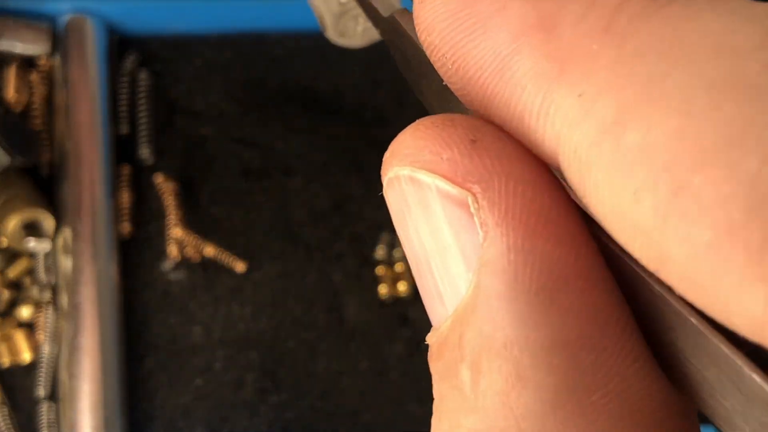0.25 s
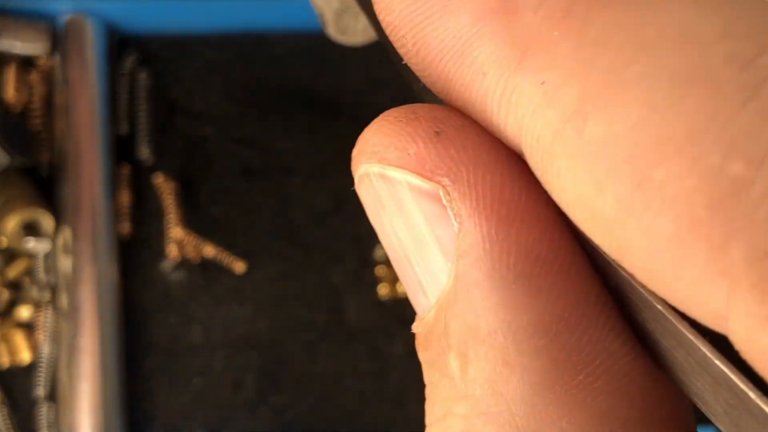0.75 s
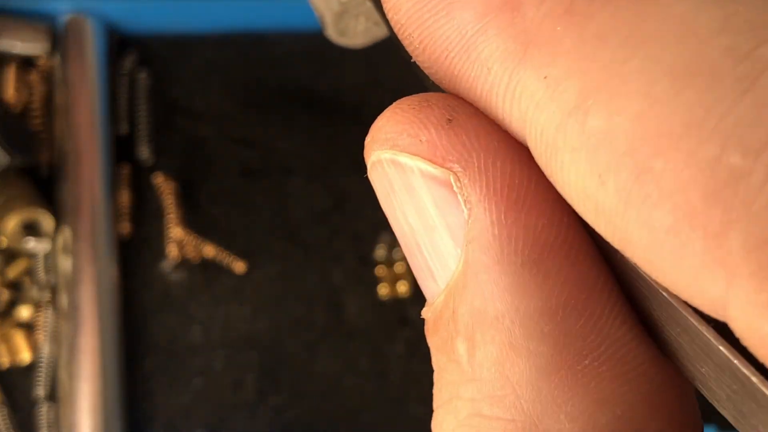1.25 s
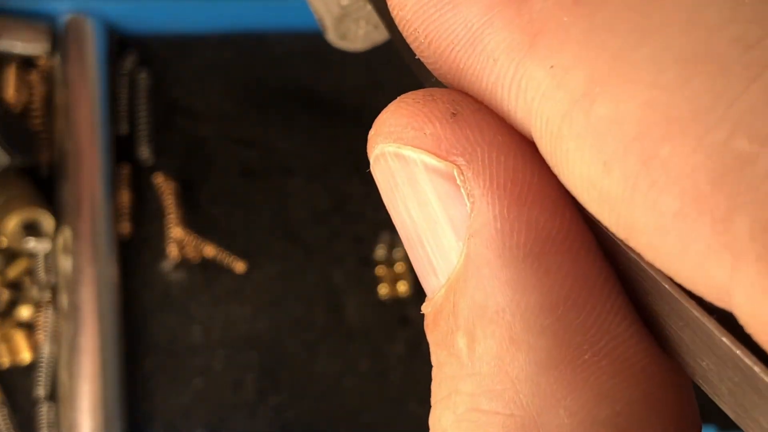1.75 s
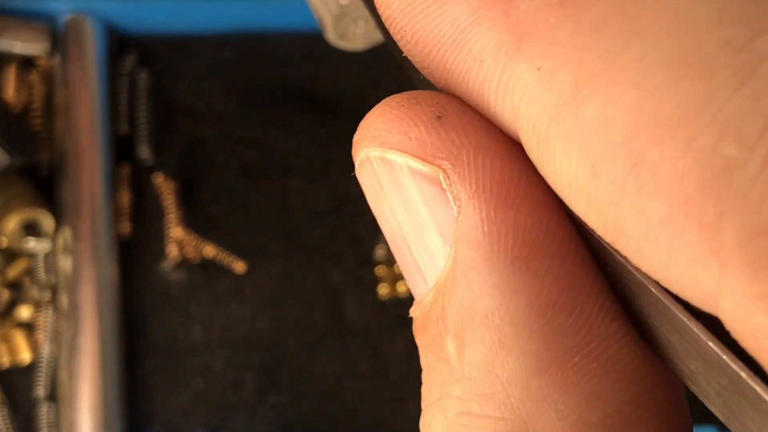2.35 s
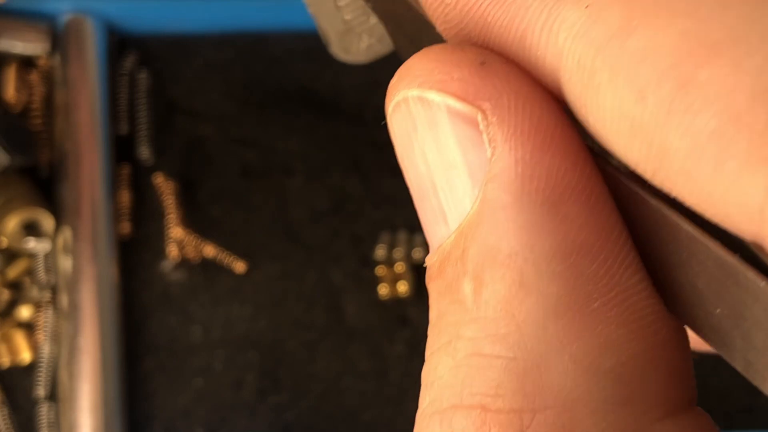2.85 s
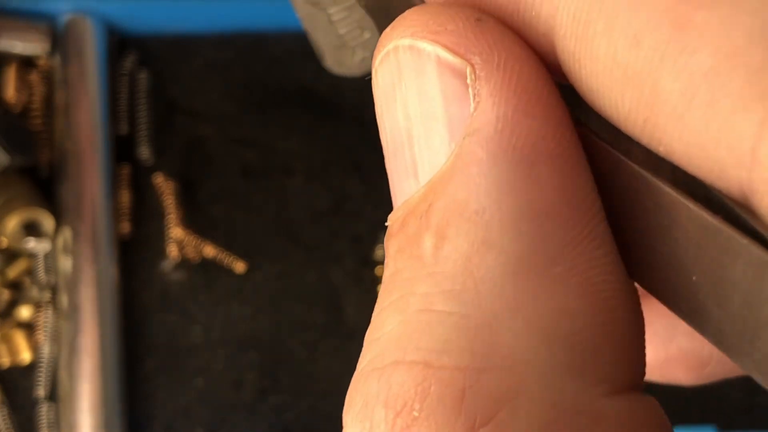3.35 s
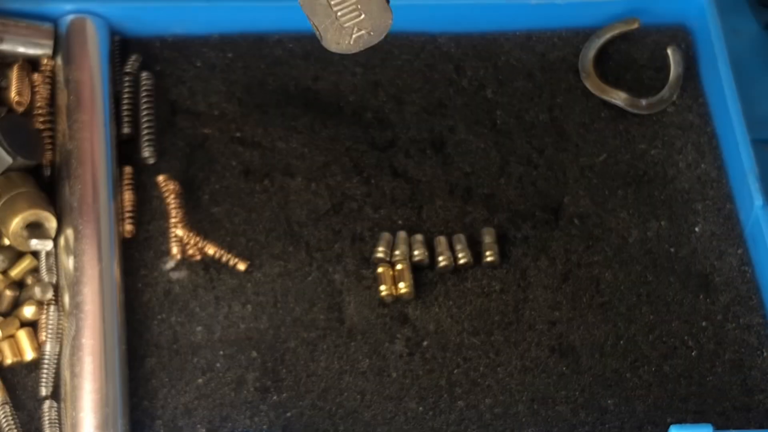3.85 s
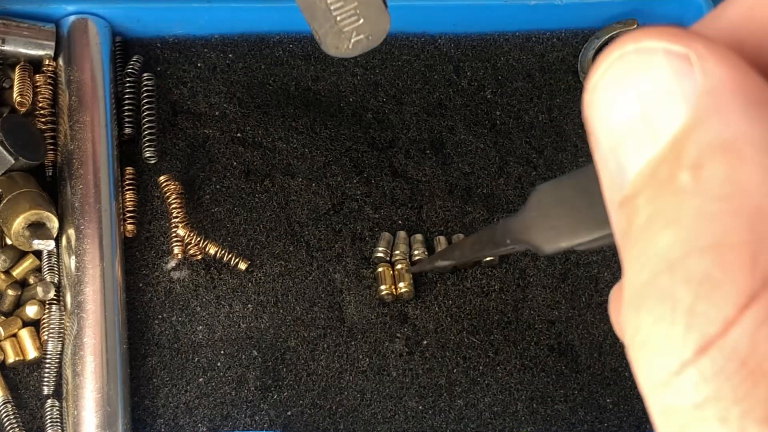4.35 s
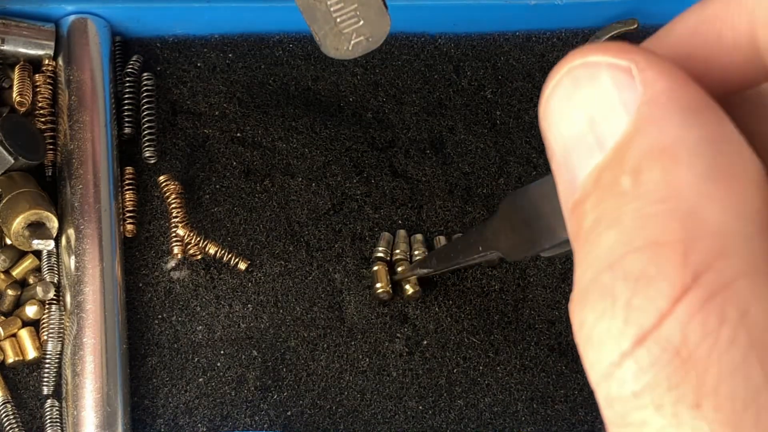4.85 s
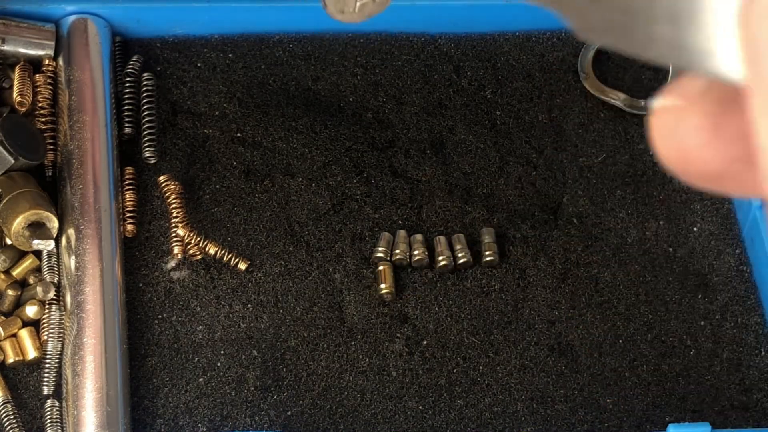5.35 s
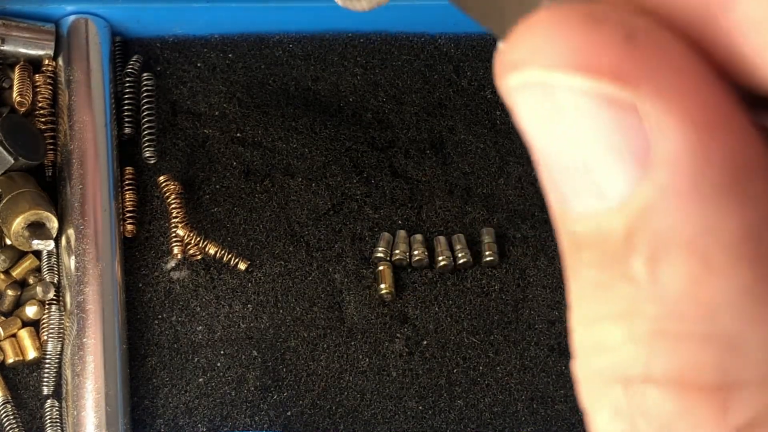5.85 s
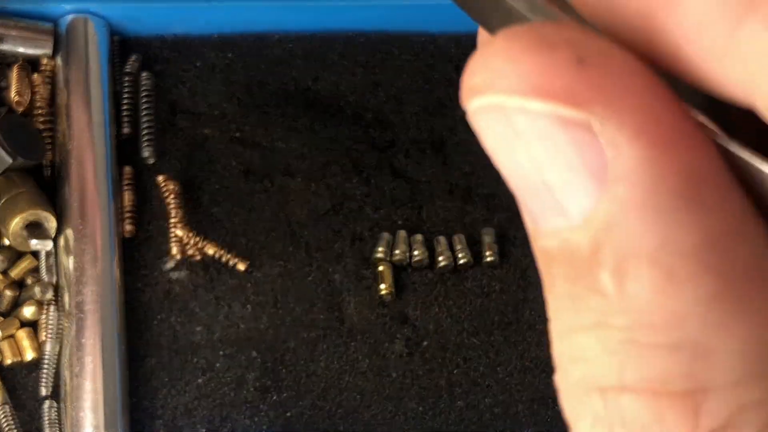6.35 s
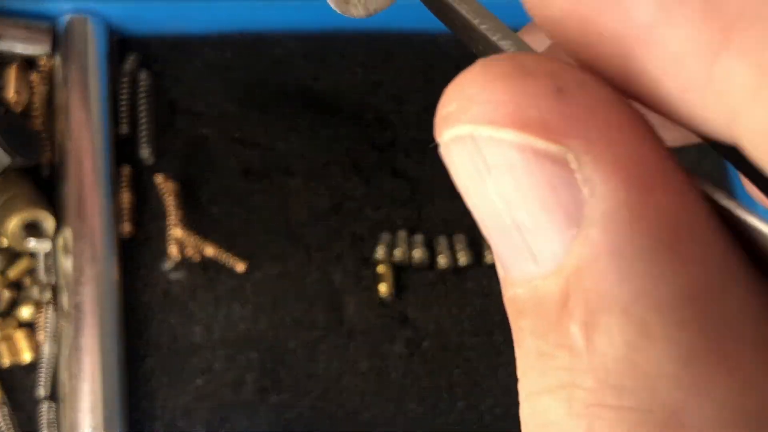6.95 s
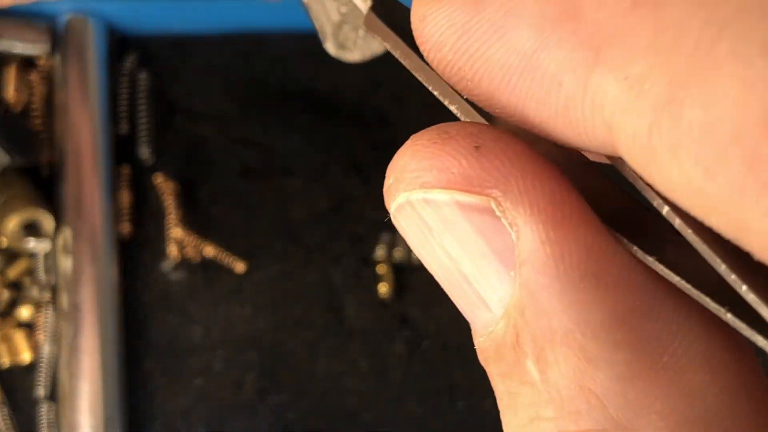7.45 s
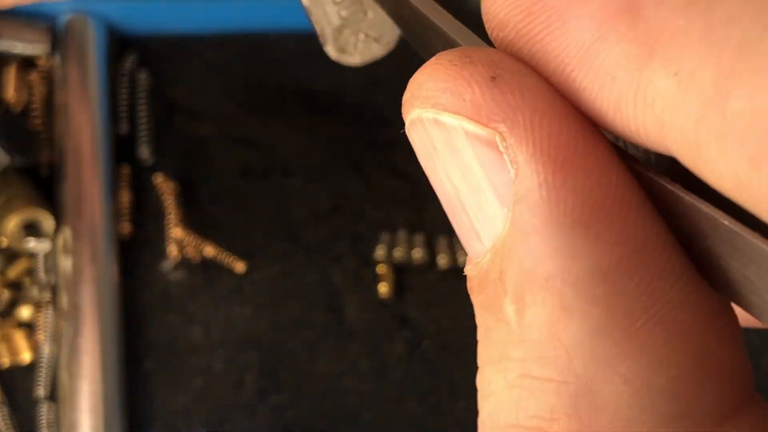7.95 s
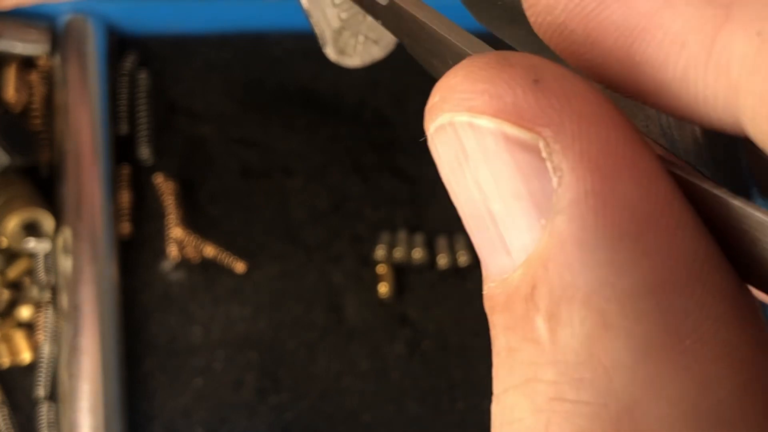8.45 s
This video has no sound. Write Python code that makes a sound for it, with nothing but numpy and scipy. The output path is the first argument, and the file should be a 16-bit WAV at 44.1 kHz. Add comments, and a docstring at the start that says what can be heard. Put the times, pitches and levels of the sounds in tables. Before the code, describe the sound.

Steel tweezers pick at small brass pins in a hand-held lock, close to the microphone. Light ticks lead to three sharp snaps and a short scrape. After a lull with faint hand rustle, a pin slides scratchily in its hole, followed by a quick cluster of bright clicks and clinks and a last scrape. A fan runs steadily in the quiet room.

```python
"""Sharp little snaps, ticks, clinks and scrapes sound close by, over a fan and a thin electronic whine.
Steel tweezers pick small brass pins from a hand-held lock in a quiet room. The tips strike and rub
the metal and make it ring; pins clink, and slide in their bores (the holes that hold them).
An automatic gain control turns the volume down for a moment after the loudest snaps."""
import sys
import numpy as np
from scipy import signal
from scipy.fft import rfft, irfft
from scipy.io import wavfile
from scipy.ndimage import uniform_filter1d

SR = 44100
rng = np.random.default_rng(int(sys.argv[2]) if len(sys.argv) > 2 else 0)


def to_wav(sig):
    """Store sig (one row per channel, or 1-D mono) as 16-bit WAV at the path in sys.argv[1].

    Samples outside -1..1 are clipped; the rate is SR.
    """
    pcm = np.clip(np.atleast_2d(sig), -1, 1) * 32767
    pcm = np.round(pcm).astype(np.int16)
    wavfile.write(sys.argv[1], SR, pcm.T)  # frames by channels


N = 383669
TIME = np.arange(N) / SR


def amp(db):
    """Turns decibels into a gain."""
    return 10 ** (np.asarray(db) / 20)


def unit(x):
    """Scales a sound to an average (rms) level of 1."""
    return x / np.sqrt(np.mean(x ** 2) + 1e-20)


def read(points, hz):
    """Reads between the rows of a table, on a log-frequency axis."""
    f, value = np.transpose(points)
    return np.interp(np.log(hz + 1), np.log(f + 1), value)


def add(mix, start_s, sound):
    """Mixes a sound in at its start time."""
    part = mix[max(round(start_s * SR), 0):][:len(sound)]
    part += sound[:len(part)]


def noise(gain):
    """Noise of level 1, coloured by gain(Hz)."""
    spectrum = rfft(rng.standard_normal(N)) * gain(np.fft.rfftfreq(N, 1 / SR))
    return unit(irfft(spectrum, N))


def narrow(hz, width):
    """Noise gathered around one frequency."""
    return noise(lambda f: 1 / (1 + ((f - hz) / width * 2) ** 2))


def fan(air_db=-49.5, flutter_db=1.0):
    """A fan's rush of air flutters slightly, with faint wavering tones."""
    # colour of the rush: (frequency [Hz], relative level [dB])
    air_colour = [(15, -19), (25, -26), (55, 0), (99, 0.5), (127, 0.5), (317, -5.5), (344, -5.5),
                  (503, -12), (641, -14.5), (695, -16), (2610, -30.5), (4370, -30), (11000, -38),
                  (12200, -35.5), (16000, -37.5)]
    # fan hum and high electronic tones: (pitch [Hz], width [Hz], level [dB])
    tones = [(295.7, 14, -68), (339.9, 9.2, -61), (643, 7.8, -67), (894, 14, -74), (3950, 32, -77),
             (4360, 200, -78.5), (10150, 560, -80)]
    air = amp(air_db + flutter_db * narrow(0.36, 13.6)) * noise(lambda f: amp(read(air_colour, f)))
    return air + sum(amp(db) * narrow(hz, width) for hz, width, db in tones)


def whine(hz=11770, db=-72.5):
    """Electronics give off one thin, steady tone."""
    return amp(db) * np.sqrt(2) * np.sin(2 * np.pi * hz * TIME)


def bounces(count=3, first_gap_s=0.012, shrink=0.6, step_db=-5.5):
    """A dropped pin lands again, each time sooner and softer."""
    # loose pins drop: (time [s], relative level of the low note [dB], of the high note [dB])
    drops = [(0.1019, -54, -52), (6.608, -35, -30), (7.3777, -47.5, -60), (7.8834, -41, -32),
             (7.9183, -40, -55), (7.9346, -31, -21), (7.9632, -36, -33)]
    for s, *levels in drops:
        for k in range(count):
            yield s, np.add(levels, k * step_db)
            s += first_gap_s * shrink ** k


def clinks(level_db=7, rise_s=0.000078, detune=0.011):
    """A pin rings with two short notes, tuned a little differently at each landing."""
    # notes of a brass pin: (pitch [Hz], time to fade by 60 dB [s])
    pin_notes = [(10520, 0.01), (14990, 0.013)]
    t, out = np.arange(SR // 20) / SR, np.zeros(N)
    attack = 1 - np.exp(-t / rise_s)
    for s, levels in bounces():
        for (hz, fade_s), db in zip(pin_notes, levels):
            tone = np.sin(2 * np.pi * hz * (1 + detune * rng.standard_normal()) * t)
            add(out, s, amp(level_db + db - 60 * t / fade_s) * tone * attack)
    return out


def ring(force, in_bore, extra_note, direct_db):
    """A force rings the part touched, plus one note set by the grip and the spot it touches."""
    # notes of tweezers held in the fingers: (pitch [Hz], width [Hz], gain [dB])
    tweezer_notes = [(940, 440, -10.5), (1543, 140, -6.5), (2220, 160, -6), (4370, 620, -7),
                     (5710, 350, -7.5), (7190, 190, -6), (7860, 520, -16.5), (9870, 320, -17.5),
                     (10790, 330, -5.5), (11760, 550, -13.5), (13900, 240, -2), (14700, 180, 0),
                     (15600, 250, 0.5)]
    # notes of a pin in its bore: (pitch [Hz], width [Hz], gain [dB])
    bore_notes = [(2086, 113, -8), (3150, 110, -15), (4700, 140, -9.5), (6180, 180, -14.5),
                  (6900, 310, -10), (8700, 63, -2), (9600, 330, -7.5), (11540, 420, -4), (12120, 130, 2.5),
                  (14000, 270, -15), (15000, 410, -1)]
    out = amp(direct_db) * force  # some of the force is heard directly
    for hz, width, db in [*(bore_notes if in_bore else tweezer_notes), extra_note]:
        out += amp(db) * signal.lfilter(*signal.iirpeak(hz, hz / width, SR), force)
    return out


def contacts(second_db=-4.5, second_bright_db=-3.5):
    """In each pinch one tip lands first; the second follows, softer and duller."""
    # the tips pinch metal: (time [s], relative level [dB], brightness [dB], lag of the second tip [s],
    # note of the tweezer arm [Hz], part that rings [0 tweezers, 1 bore])
    pinches = [(0.8266, -61, 3, .001, 7540, 0), (1.2236, -40, -6, .015, 4450, 0),
               (1.394, -47, 3, .015, 4350, 0), (1.5664, -56.5, -3, .001, 4330, 0),
               (1.6118, -46.5, -2.5, 0.0095, 4350, 0), (1.6734, -43.5, -4, .001, 4100, 0),
               (2.3462, -44, 0.5, .001, 4460, 0), (2.493, -30, 0.5, .0003, 4360, 0),
               (2.729, -50, -3, .023, 5300, 0), (2.9606, -28, 7, .001, 3970, 1),
               (3.369, -27.5, 2, 0.0031, 4700, 0), (4.6498, -52, 5.5, .001, 4130, 1),
               (5.939, -52, -6, .001, 6680, 0), (6.214, -48, -6, 0.00085, 5240, 1),
               (6.3365, -47.5, -2, 0.00079, 5160, 0), (6.4774, -46.5, 5.5, 0.018, 4330, 0),
               (7.0941, -42, 17, .0015, 5940, 1), (7.5342, -57, 3, .001, 7400, 1),
               (7.7265, -59.5, 8, .001, 4440, 1), (7.829, -41.5, 2, .001, 3900, 0),
               (7.8578, -32.5, 19.5, 0.0054, 3860, 0), (7.863, -30.5, 10, .001, 4000, 0),
               (7.946, -33, 7.5, 0.00045, 4300, 0), (7.9891, -41, 4.5, .011, 4110, 0),
               (8.0339, -53, -3, .001, 4240, 0), (8.125, -53, -4, .023, 4180, 0),
               (8.4944, -52.5, 9, .001, 5900, 1), (8.6054, -39, 6.5, 0.0011, 4200, 0),
               (8.6446, -56, 8, 0.00089, 5750, 1)]
    # knock, body, ring and edge of a click: (level offset [dB], share of the brightness [0 to 1])
    balance = [(-12, .1), (0.5, 0.023), (0, 0.73), (2.9, 1)]
    for s, db, bright_db, lag_s, arm_hz, in_bore in pinches:
        first = (s, db, bright_db)
        second = (s + lag_s, db + second_db, bright_db + second_bright_db)
        for at, level, bright in first, second:
            band_levels = [level + offset + share * bright for offset, share in balance]
            yield at, band_levels, arm_hz, in_bore


def clicks(rise_s=.0002, chatter=1.7, direct_db=-27, crack_db=18, level_db=-1.0, arm_width_hz=330):
    """A tip hits metal with a snap and about a millisecond of chatter, which make it ring."""
    # ranges of the knock, body, ring and edge: (low end [Hz], high end [Hz])
    bands = [(750, 2850), (2850, 9000), (9000, 13000), (13000, 16100)]
    filters = [signal.butter(4, band, "bandpass", fs=SR, output="sos") for band in bands]
    t, out = np.arange(SR // 40) / SR, np.zeros(N)
    span = .004 * SR  # each band's level counts its energy as if spread over 4 ms
    for s, band_levels, arm_hz, in_bore in contacts():
        # hard blows chatter longer, damp the arm and crack at all frequencies
        hardness = np.interp(band_levels[0], [-54, -40], [0, 1])
        rise = rise_s * (1 + hardness)
        force = chatter * rng.standard_normal(len(t)) * t / rise * np.exp(-t / rise)
        force[np.argmin(abs(t - rise))] += 1  # the snap
        arm_note = (arm_hz, arm_width_hz * (1 + hardness), -1)
        sound = ring(force, in_bore, arm_note, direct_db + crack_db * hardness)
        for sos, db in zip(filters, band_levels):
            band = signal.sosfilt(sos, sound)
            add(out, s, amp(level_db + db) * band * np.sqrt(span / np.sum(band ** 2)))
    return out


def hand():
    """The hand shifts its grip with soft, low rustles."""
    # grip changes: (time [s], length [s], pitch [Hz], level [dB])
    shifts = [(1.108, 0.58, 149, -52.5), (4.988, 0.63, 307, -52), (5.982, 0.304, 211, -48)]
    return sum(amp(db) * narrow(hz, hz * 0.51) * np.sin(np.pi * np.clip((TIME - s) / length, 0, 1))
               for s, length, hz, db in shifts)


def hiss_trails(length_s=0.055, fade_s=0.0066):
    """A brief, even hiss follows the hardest snaps and stops short."""
    # hisses: (time [s], level [dB])
    hisses = [(2.964, -52), (3.373, -49.5)]
    # colour of the hiss: (frequency [Hz], relative level [dB])
    colour = [(300, -17), (1200, -0.5), (4500, -2), (7500, -5), (16000, -9)]
    gate = sum(amp(db) * (TIME > s) * np.clip((s + length_s - TIME) / fade_s, 0, 1) for s, db in hisses)
    return gate * noise(lambda f: amp(read(colour, f)))


def friction(envelope, note_hz, in_bore, slips_per_s=1100, uneven_db=4.5, rub=0.12):
    """Rubbing metal catches and slips; the many tiny, uneven kicks ring the tweezers or the bore."""
    slips = rng.random(SR // 2) < slips_per_s / SR
    size = amp(uneven_db * np.clip(rng.standard_normal(SR // 2), -2, 2))
    grit = rng.standard_normal(SR // 2)
    force = np.resize(slips * size * np.sign(grit) + rub * grit, len(envelope))
    return envelope * unit(ring(force, in_bore, extra_note=(note_hz, 420, -3), direct_db=-27))


def scrapes(arch=.9):
    """A tip brushes over metal in short strokes that swell and fade."""
    # strokes: (time [s], length [s], level [dB], extra note [Hz], part that rings [0 tweezers, 1 bore])
    strokes = [(3.122, 0.028, -43.5, 3220, 1), (4.719, .065, -53.5, 7500, 0), (6.557, 0.061, -48, 10200, 0),
               (7.813, 0.023, -41.5, 5700, 0), (7.86, 0.071, -48, 14400, 0), (7.961, .053, -45.5, 14400, 0),
               (8.04, 0.057, -55, 4170, 0), (8.187, .045, -57.5, 15400, 0)]
    out = np.zeros(N)
    for s, length, db, note_hz, in_bore in strokes:
        t = np.arange(0, length, 1 / SR)
        envelope = amp(db) * abs(np.sin(np.pi * t / length)) ** arch
        add(out, s, friction(envelope, note_hz, in_bore))
    return out


def long_stroke(push, note_hz, in_bore, level_db):
    """A long rub whose loudness follows the push of the hand."""
    times, db = np.transpose(push)
    out, t = np.zeros(N), np.arange(times[0], times[-1], 1 / SR)
    envelope = amp(level_db + np.interp(t, times, db))
    add(out, times[0], friction(envelope, note_hz, in_bore))
    return out


def pin_slide():
    """A pin slides along its bore in fits and starts."""
    # push on the pin: (time [s], relative level [dB])
    push = [(7.092, -58), (7.1, -37), (7.104, -36), (7.122, -37), (7.128, -35), (7.144, -68), (7.164, -43),
            (7.174, -40.5), (7.204, -72), (7.236, -41), (7.278, -53.5), (7.292, -41.5), (7.308, -49),
            (7.316, -42.5), (7.37, -68)]
    return long_stroke(push, note_hz=15700, in_bore=True, level_db=-0.5)


def tip_drag():
    """The tips drag over a pin, ease off and bite again."""
    # push on the tips: (time [s], relative level [dB])
    push = [(8.491, -70), (8.497, -44.5), (8.545, -67), (8.57, -65), (8.585, -45), (8.612, -37.5),
            (8.624, -49), (8.633, -39.5), (8.645, -64)]
    return long_stroke(push, note_hz=4100, in_bore=False, level_db=-1.5)


def room(x, tail_db=-23, dull_hz=4000, build_s=0.02):
    """Sound bounces off nearby things, then dies away in a faint, duller tail."""
    # echoes from the hand and desk: (delay [s], gain [dB])
    echoes = [(.0011, -19.5), (.0036, -15), (.0052, -22), (.0087, -21.5)]
    # the room's tail: (frequency [Hz], time to fade by 60 dB [s])
    fade_times = [(1000, 0.46), (5000, 0.27), (15000, 0.31)]
    hz, t, spectrum = signal.stft(rng.standard_normal(SR // 2), SR, nperseg=256)
    fade = amp(-60 * t / read(fade_times, hz)[:, None])
    tail = signal.istft(spectrum * fade / np.hypot(1, hz / dull_hz)[:, None], SR, nperseg=256)[1]
    tail *= np.minimum(np.arange(len(tail)) / SR / build_s, 1)
    response = amp(tail_db) * tail / np.linalg.norm(tail)
    response[0] += 1  # the direct sound
    for delay, db in echoes:
        response[round(delay * SR)] += amp(db)
    return signal.fftconvolve(x, response)[:N]


def scene():
    """The metal sounds echo in the room, joined by hiss, hand rustle, fan and whine."""
    metal = pin_slide() + tip_drag() + clicks() + clinks() + scrapes()
    return (room(metal) + hiss_trails() + hand() + fan() + whine())[None]


def record(dry, threshold_db=-27, recover_db_per_s=22, depth=0.33, attack_s=0.0071, top_hz=16100):
    """Gain control lets a loud snap through, then dips for a moment; the highest treble is cut off."""
    power_db = 10 * np.log10(abs(uniform_filter1d(dry[0] ** 2, size=441)) + 1e-12)
    fall = TIME * recover_db_per_s
    held_db = np.maximum.accumulate(power_db + fall) - fall  # jumps to each peak, then sinks
    over_db = np.maximum(held_db - threshold_db, 0)
    smooth = np.exp(-1 / (attack_s * SR))
    dip_db = depth * signal.lfilter([1 - smooth], [1, -smooth], over_db)
    lowpass = signal.firwin(241, top_hz, window=("kaiser", 8), fs=SR)
    return signal.oaconvolve(dry / amp(dip_db), lowpass[None], "same")


dry = scene()
out = record(dry)
to_wav(out)
```